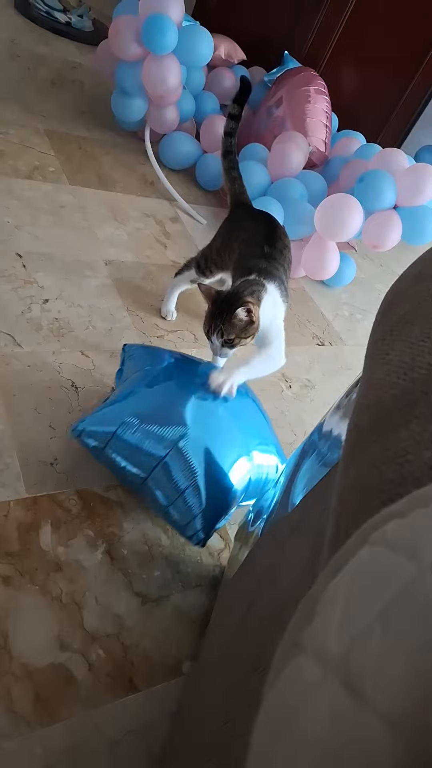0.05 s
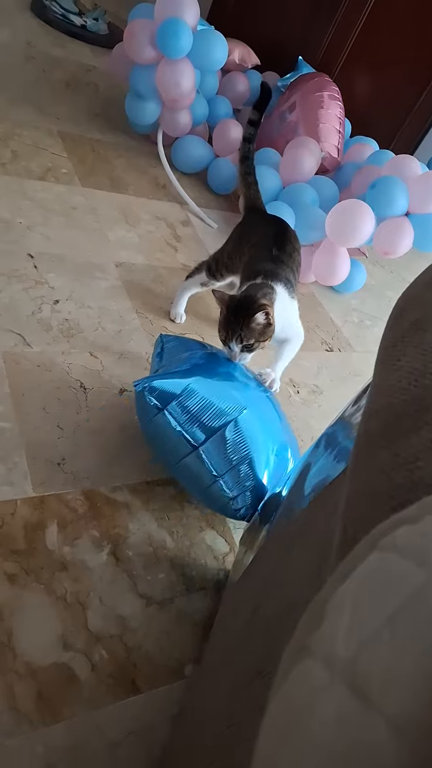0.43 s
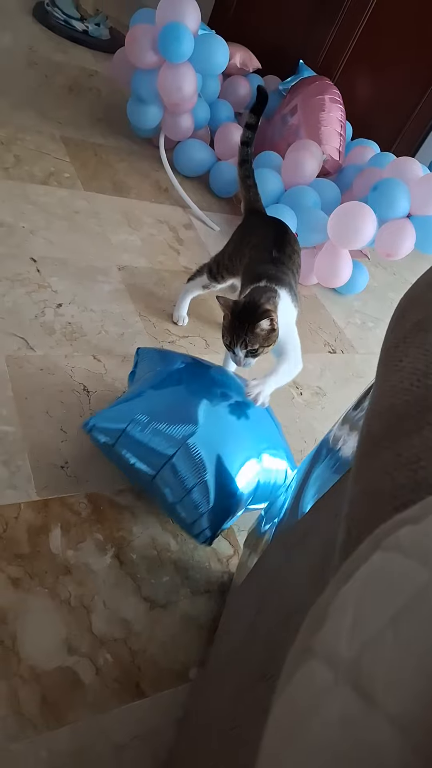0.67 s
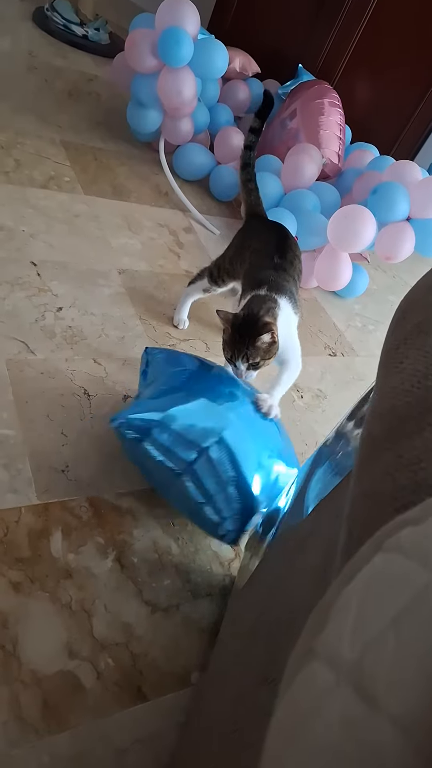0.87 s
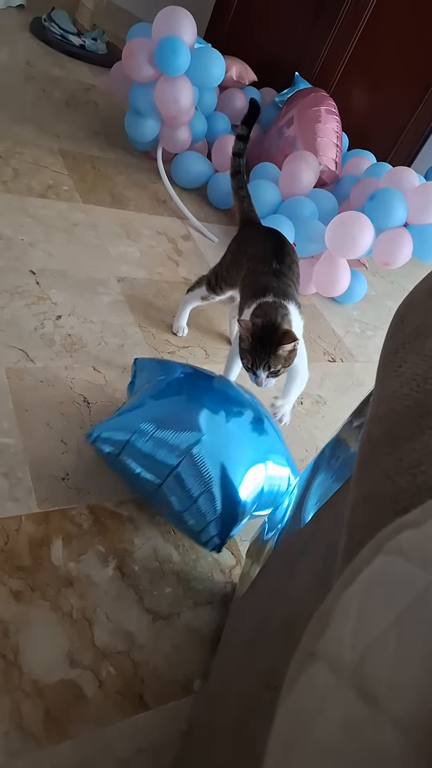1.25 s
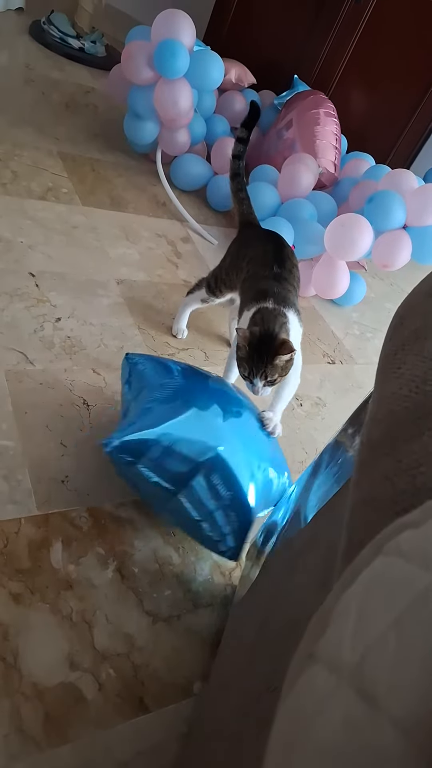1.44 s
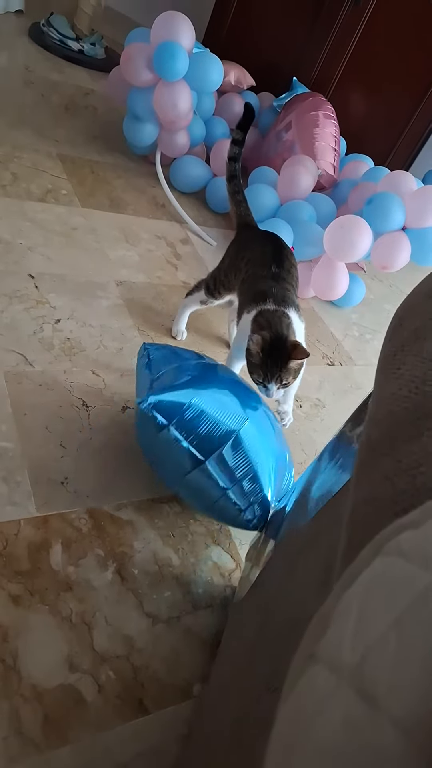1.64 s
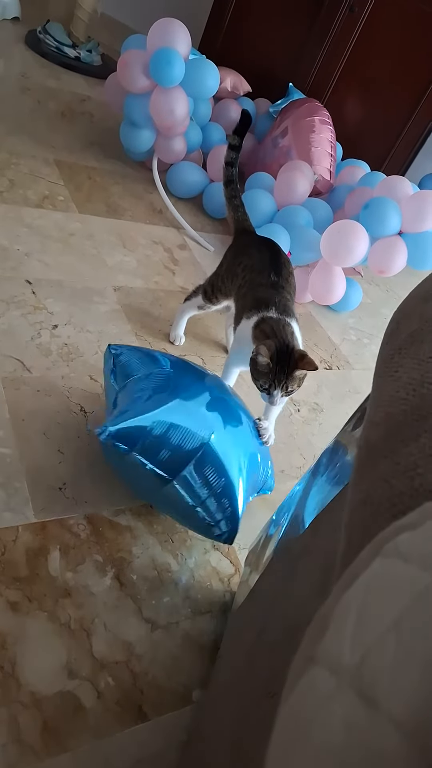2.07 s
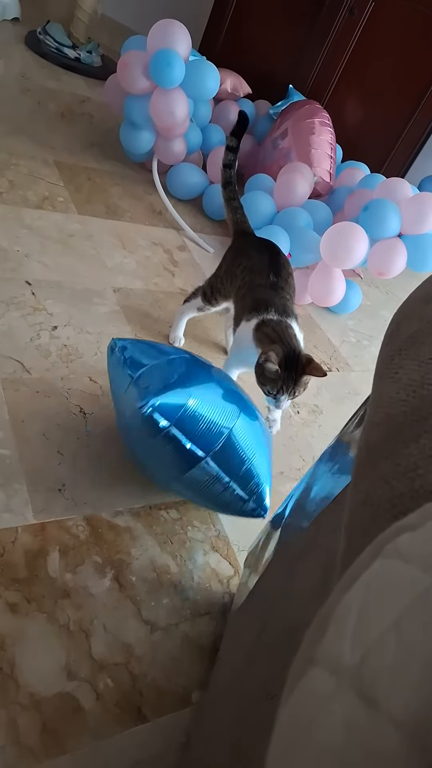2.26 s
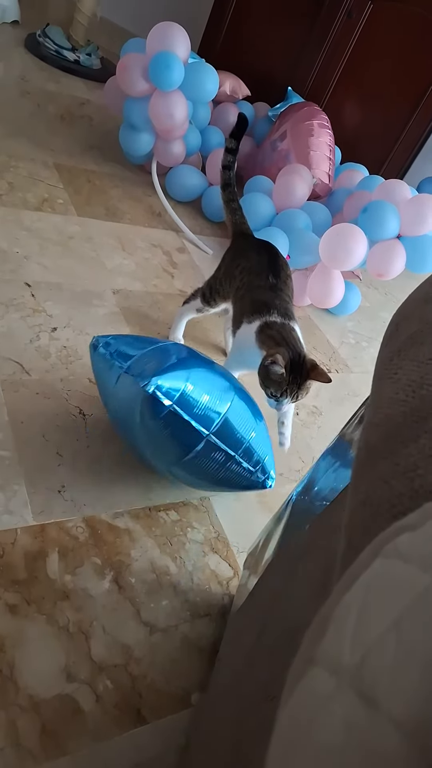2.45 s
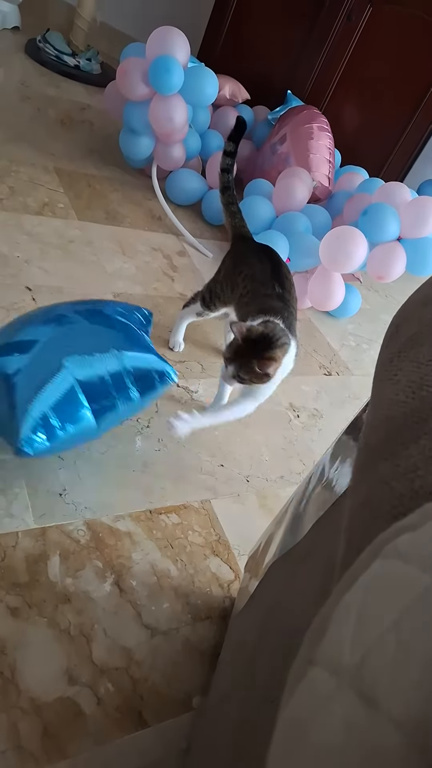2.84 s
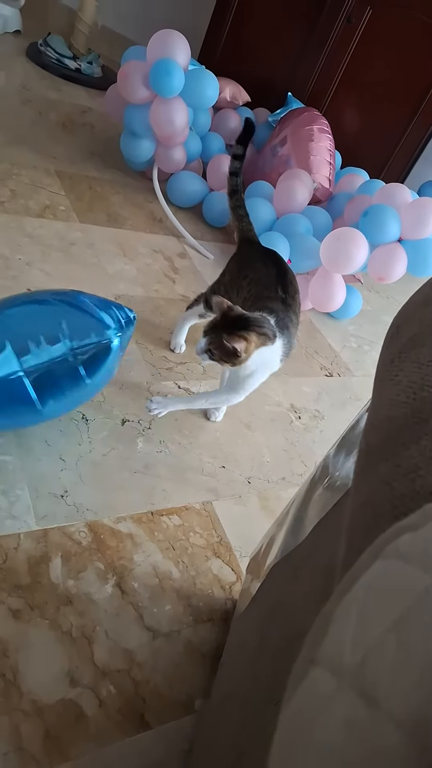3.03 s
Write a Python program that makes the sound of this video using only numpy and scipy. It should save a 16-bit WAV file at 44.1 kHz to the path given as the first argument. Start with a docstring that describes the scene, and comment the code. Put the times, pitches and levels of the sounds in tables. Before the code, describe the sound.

A foil balloon, pawed by a cat close by and slightly right, thumps softly and crackles, with a dense run of snaps around 0.4 seconds. More thumps and sharp snaps come from 0.8 to 1.1, then bumps and sliding rustles from 1.4. A faint, thin squeak at 2.5 leads into a loud swipe at 2.6, and light rustles follow. The bare room echoes over a low hum and rumble.

```python
"""A bare, echoing room with a stone floor. Close to a stereo microphone pair, a little to the right,
a cat paws a foil balloon along. Soft blows thump the gas inside, the foil buckles in sharp snaps,
and it rustles as paw and floor slide on it. A thin squeak comes just before the last swipe.
Behind it all, a low hum and rumble fill the room."""
import sys
import numpy as np
from scipy import signal
from scipy.fft import rfft, irfft
from scipy.io import wavfile
from scipy.ndimage import uniform_filter1d

SR = 44100
rng = np.random.default_rng(int(sys.argv[2]) if len(sys.argv) > 2 else 0)


def put_to_file(sound):
    """Save the sound as 16-bit audio at rate SR, in the file named by the first command-line argument."""
    columns = np.atleast_2d(sound).T  # one column per channel
    safe = np.clip(columns, -1, 1)
    whole_steps = np.round(safe * 32767)
    wavfile.write(sys.argv[1], SR, whole_steps.astype(np.int16))


N = 136710

# paw blows and bumps on the floor (time [s], level [dB], firmness as cut-off [Hz])
BLOWS = [(0.144, -4.5, 310), (0.152, 1, 321), (0.179, -7.5, 384), (0.202, -0.5, 220), (0.3519, -7, 215),
         (0.38, -2, 308), (0.426, -4.5, 280), (0.8152, 5, 150), (0.835, -4.5, 171), (0.886, -5.5, 232),
         (0.98, -25, 168), (1.012, -1.5, 170), (1.083, -6, 150), (1.4146, 5, 141), (1.434, -7.5, 136),
         (1.562, -2.5, 160), (1.629, -15, 148), (1.984, -7, 162), (2.058, -9, 151), (2.646, -1, 139)]
# the foil buckles (time [s], level [dB], extra crack level [dB])
BUCKLES = [(0.0701, -26.5, -0.5), (0.1447, -22.5, 1), (0.182, -12, -14), (0.2224, -4.5, -1.5),
           (0.305, -12.5, 0), (0.3529, 1, -1.5), (0.3796, -2, 2), (0.3834, -8, -4), (0.3859, 0.5, -6),
           (0.39, -5, 1), (0.3963, -1.5, -6.5), (0.4056, -7.5, -2), (0.4157, -1.5, 0.5), (0.42, -5, 4),
           (0.4249, -0.5, -5), (0.43, -6, -7), (0.436, -9, -5), (0.459, -5, 4), (0.464, -7.5, -6),
           (0.816, -14.5, -11), (0.8436, -3, -12.5), (0.853, -9, -16), (0.9528, -3, -0.5),
           (0.9792, 1.5, 1.5), (1.0147, 0, 3), (1.083, 3.5, 0), (1.091, -1.5, 0.5), (1.5706, -8, -1),
           (1.6377, -12, 6), (2.6453, -8, -21), (2.769, -24.5, 12)]
# a snap's pressure pulse (frequency [Hz], level [dB])
POP_SPECTRUM = [(60, -17.5), (200, -3.5), (400, -2.5), (650, -3), (850, -10), (1150, -6.5), (1500, -13.5),
                (2000, -11), (3000, -25), (6000, -44), (16000, -49)]
# a snap's bright edge (frequency [Hz], level [dB])
CRACK_SPECTRUM = [(200, -8.5), (600, 0.5), (1150, 1), (2000, -1.5), (3000, -4.5), (4200, -2.5),
                  (6500, -5.5), (9000, -1.5), (12000, -3), (16000, -12.5)]
# paw or floor slides on the foil
# (start [s], rise [s], hold [s], release [s], level [dB], hiss [dB], bass [dB], room send [dB])
SLIDES = [(0.14, 0.0027, 0.036, 0.075, -10, -5, -8, -2.5), (0.288, 0.019, 0.023, 0.012, -2, -6, -12, -2),
          (0.379, 0.0017, 0.091, 0.056, 1.5, 2, 10, -0.5),
          (0.818, 0.0018, 0.0095, 0.0065, -3.5, -1.5, 3.5, -5),
          (0.84, 0.0028, 0.0089, .008, -0.5, -22, -7, -3), (0.862, .01, 0.056, .02, -11, -4, 10, -6),
          (0.974, 0.026, 0.095, .03, -9, 3, 14, 9), (1.415, 0.0018, 0.027, 0.043, -3.5, 3, -18, 2),
          (1.524, 0.019, 0.034, 0.064, -7, -16, -3, -3), (1.643, .02, 0.037, 0.025, -11, 5, -11, 5),
          (1.985, 0.023, 0.1, 0.04, -4.5, 1.5, -2, 0.5), (2.264, 0.055, 0.052, 0.022, -8, 4, -3, 0.5),
          (2.52, 0.026, 0.077, .02, -18, 2, -34, -5), (2.597, 0.011, 0.011, 0.0035, -0.5, -7, -11, -3.5),
          (2.618, 0.0045, 0.013, 0.012, 4.5, -1, -2.5, 3),
          (2.647, 0.0032, 0.0047, 0.0043, 15, -19, -10, -6.5), (2.663, 0.013, 0.02, 0.017, -3, -0.5, -4, 1),
          (2.72, 0.035, 0.03, 0.014, -5, 2, -3, 0.5), (2.95, .008, 0.006, 0.013, -17, 4.5, 0, 3),
          (3.06, 0.014, 0.027, .03, -19.5, 4.5, -3, -5)]
# the rubbed skin drums (frequency [Hz], level [dB])
SKIN_SPECTRUM = [(100, -16.5), (250, 2), (450, 4.5), (750, -4), (1200, 0), (1500, -1), (1900, -0.5),
                 (2800, -5.5), (4500, -9), (8000, -20.5), (16000, -29)]
# the creases hiss (frequency [Hz], level [dB])
HISS_SPECTRUM = [(500, -12.5), (2000, -15), (3000, 3), (4300, 3), (6800, -1), (8500, 1.5), (10000, -0.5),
                 (12500, 1), (16000, -10)]
# the low end of a slide (frequency [Hz], level [dB])
BASS_SPECTRUM = [(60, -11), (130, 2), (190, -4), (330, -1.5), (480, -14.5), (1000, -26), (4000, -64)]
# resonances of the gas (frequency [Hz], level [dB], time to fall 60 dB [s])
GAS_MODES = [(158.7, 3, 0.19), (207, -18, 0.22), (255.1, -2.5, 0.2), (307, 0, 0.13), (362.8, -5.5, 0.51),
             (397.1, -15.5, 0.75), (519, -9, 0.75), (674.6, 5, 0.073), (872, -11, 0.32), (1113, -2.5, .4),
             (1232, -9, 0.35)]
# the squeak's course (time [s], unsounded fundamental [Hz], level [dB])
SQUEAK_PATH = [(2.506, 3850, -82), (2.53, 3910, -64.5), (2.566, 4060, -63), (2.596, 4140, -61),
               (2.618, 4070, -57), (2.63, 4050, -85)]
# its sounding partials (harmonic [number], level [dB])
SQUEAK_HARMONICS = [(2, -12), (3, -3)]
# near reflections off floor and furniture (delay [s], level [dB])
REFLECTIONS = [(.00105, -9), (.0042, -17.5), (.0086, -11)]
# reverberation time (frequency [Hz], time to fall 60 dB [s])
ROOM_DECAY = [(80, 0.69), (260, 0.66), (700, 0.8), (1840, 0.72), (4850, 0.75), (12800, 0.54)]
# tone of the reverberation (frequency [Hz], level [dB])
ROOM_SPECTRUM = [(60, 4.5), (150, 4), (300, 1), (480, -2.5), (660, 1.5), (900, -3), (1200, -0.5), (3000, 0),
                 (8000, -2), (16000, -7)]
# background rumble (frequency [Hz], level [dB])
RUMBLE_SPECTRUM = [(20, -42), (35, -9), (52, 3.5), (70, -6), (110, -3), (160, -13), (400, -17),
                   (800, -23.5), (1300, -27.5), (3000, -47), (8000, -47), (16000, -70)]
# likeness of the room sound at the two microphones (frequency [Hz], correlation [ratio])
MIC_COHERENCE = [(60, 0.88), (250, 0.9), (500, 0.65), (1000, 0.15), (2000, 0.0078), (16000, 0.013)]
# stereo balance (frequency [Hz], left minus right [dB])
MIC_BALANCE = [(60, 2.5), (250, -1.5), (500, -2.5), (1000, -4), (2000, -2.5), (4000, -1), (8000, -3),
               (13000, -9.5)]

# Table levels are relative: these gains set the mix. WET gains feed the room.
THUMP_DB, THUMP_LOW_CUT_HZ, THUMP_WET_DB = 12, 68, -0.5
POP_DB, CRACK_DB, CRACK_DECAY_S, SNAP_WET_DB = 5, -26.5, 0.001, 1
SHIVER_DB, SHIVER_DECAY_S = -6, 0.0067
SKIN_DB, HISS_DB, BASS_DB, RUB_WET_DB = -37, -50, -41, 3.5
SLIPS_PER_S, SLIP_SPREAD_DB = 7000, 1.65
THUMP_RING_DB, FOIL_RING_DB = -62, -48  # how strongly each rings the gas
SQUEAK_DB, SQUEAK_WET_DB = 5.5, -1
ROOM_BUILD_S, RUMBLE_DB, HUM_HZ, HUM_DB = 0.0096, -51.5, 86.6, -51.5
MIC_OPEN_S, MIC_FADE_S, MIC_LOW_HZ, MIC_TOP_HZ = 0.065, 0.0083, 34, 15900


def thumps():
    """Soft pushes on the balloon: the firmer the contact, the higher in frequency the pulse reaches."""
    pulses, kick = np.zeros(N), signal.unit_impulse(SR // 10)
    for start, db, cutoff_hz in BLOWS:
        pulse = signal.sosfilt(signal.butter(4, cutoff_hz, fs=SR, output="sos"), kick)
        add(pulses, start, -undb(db + THUMP_DB) * pulse)
    return signal.sosfilt(signal.butter(2, THUMP_LOW_CUT_HZ, "high", fs=SR, output="sos"), pulses)


def snaps(t):
    """A patch of foil flips: one pressure pulse from the skin, a bright crack and a short shiver."""
    age, flips, cracks = t[:SR // 20], np.zeros(N), np.zeros((2, N))
    fade = np.exp(-(age / CRACK_DECAY_S) ** 2) + undb(SHIVER_DB) * np.exp(-age / SHIVER_DECAY_S)
    for start, db, crack_db in BUCKLES:
        add(flips, start, undb([db]))
        noise = np.sign(rng.standard_normal((2, len(age))))
        add(cracks, start, undb(db + crack_db) * fade * noise)
    pops = undb(POP_DB) * colour(flips, POP_SPECTRUM)
    return pops + undb(CRACK_DB) * colour(near_pair(cracks), CRACK_SPECTRUM)


def rubs(t):
    """Dense tiny slips drum on the skin and hiss in the creases. Gives direct sound and room send."""
    drives = np.zeros((3, 2, N))  # skin, hiss, bass; each direct and to the room
    for start, rise, hold, release, db, hiss_db, bass_db, room_db in SLIDES:
        attack = np.clip((t - start) / rise, 0, 1)
        fade = np.exp(-np.maximum(t - start - rise - hold, 0) / release)
        gains = np.outer(undb([SKIN_DB, HISS_DB + hiss_db, BASS_DB + bass_db]), undb([0, room_db]))
        drives += gains[..., None] * undb(db) * attack * fade
    sizes = undb(SLIP_SPREAD_DB * np.minimum(rng.exponential(size=N), 4))
    slips = (rng.random(N) < SLIPS_PER_S / SR) * sizes * rng.standard_normal((2, N))
    slips = near_pair(slips / slips.std())
    spectra = SKIN_SPECTRUM, HISS_SPECTRUM, BASS_SPECTRUM
    return sum(colour(drive[:, None] * slips, shape) for drive, shape in zip(drives, spectra))


def gas_ring(strikes, t):
    """The gas inside the balloon rings on with whatever strikes the skin."""
    modes = sum(undb(db) * np.cos(2 * np.pi * hz * t) * decay(t, t60) for hz, db, t60 in GAS_MODES)
    return convolve(strikes, modes)


def squeak(t):
    """A thin, slightly unsteady squeak that rises and sags at the end."""
    times, hz, db = np.array(SQUEAK_PATH).T
    waver = uniform_filter1d(rng.standard_normal(N), size=60)
    pitch = np.interp(t, times, hz) * (1 + .003 * waver / waver.std())
    phase = 2 * np.pi * np.cumsum(pitch) / SR
    level = undb(np.interp(t, times, db)) * (t > times[0]) * (t < times[-1])
    return level * sum(undb(gain_db) * np.sin(round(k) * phase) for k, gain_db in SQUEAK_HARMONICS)


def near_echoes(x):
    """Floor and furniture return delayed, weaker copies."""
    return weigh(x, sum(undb(db) * np.exp(-2j * np.pi * bins() * lag) for lag, db in REFLECTIONS))


def room_tail(t):
    """The bare room's reverberant response, each octave dying at its own rate."""
    noise, tail = rfft(diffuse()), 0
    centres = np.geomspace(60, 15360, 9)
    hz = np.maximum(np.linspace(0, SR / 2, noise.shape[1]), 1)
    for centre, share in zip(centres, np.eye(len(centres))):
        band = irfft(noise * np.interp(np.log(hz), np.log(centres), share), N)
        tail += band * decay(t, along(ROOM_DECAY, centre))
    tail *= 1 - np.exp(-(t / ROOM_BUILD_S) ** 2)
    return colour(tail / np.sqrt(np.sum(tail ** 2) / 2), ROOM_SPECTRUM)


def room_tone(t):
    """Low rumble all around the microphones, with a wavering hum."""
    rumble = colour(diffuse(), RUMBLE_SPECTRUM)
    waver = weigh(rng.standard_normal(N), np.exp(-(bins() / 4) ** 2))
    hum = (1 + 0.39 * waver / waver.std()) * np.sin(2 * np.pi * HUM_HZ * t)
    return undb(RUMBLE_DB) * rumble / rumble.std() + undb(HUM_DB) * hum


def diffuse():
    """Noise at the two microphones, alike in the bass and unrelated in the treble."""
    likeness = np.clip(along(MIC_COHERENCE, bins()), -1, 1)
    mid, side = rng.standard_normal((2, N))
    mid = weigh(mid, np.sqrt((1 + likeness) / 2))
    side = weigh(side, np.sqrt((1 - likeness) / 2))
    return np.array([mid + side, mid - side])


def near_pair(x):
    """Two unrelated signals become one in the bass, as at two close microphones."""
    shared = 1 / (1 + (bins() / 1900) ** 4)
    left = weigh(x[0], np.sqrt(shared)) + weigh(x[1], np.sqrt(1 - shared))
    return np.array([left, x[0]])


def undb(db):
    """Decibels to gain."""
    return 10 ** (np.asarray(db) / 20)


def decay(t, t60):
    """A fall of 60 dB every t60 seconds."""
    return np.exp(-np.log(1000) * t / t60)


def along(points, hz):
    """Read a table on a log-frequency axis."""
    knots_hz, values = np.array(points, float).T
    return np.interp(np.log(np.maximum(hz, 1)), np.log(knots_hz), values)


def bins():
    """Frequencies of the padded spectrum."""
    return np.arange(N + 1) * SR / (2 * N)


def weigh(x, gain):
    """Apply a gain for each frequency."""
    return irfft(rfft(x, 2 * N) * gain)[..., :N]


def colour(x, points):
    """Causal filter through (frequency [Hz], level [dB]) points."""
    cepstrum = irfft(np.log(undb(along(points, bins()))))
    cepstrum[1:N] *= 2  # fold onto positive time for minimum phase
    cepstrum[N + 1:] = 0
    return weigh(x, np.exp(rfft(cepstrum)))


def convolve(x, response):
    """Pass a sound through a response."""
    return weigh(x, rfft(response, 2 * N))


def add(out, start, x):
    """Mix a sound in at its time."""
    i = max(int(start * SR), 0)
    out[..., i:i + x.shape[-1]] += x[..., :N - i]


def scene():
    """The balloon close by and a little to the right, with its near echoes and the room behind."""
    t = np.arange(N) / SR
    tail, background = room_tail(t), room_tone(t)
    rub, rub_send = rubs(t)
    thump, thin_squeak, snap = thumps(), squeak(t), snaps(t)
    foil = snap + rub
    gas = gas_ring(undb(THUMP_RING_DB) * thump + undb(FOIL_RING_DB) * foil.mean(axis=0), t)
    direct = thump + foil + gas + undb(SQUEAK_DB) * thin_squeak
    send = (undb(THUMP_WET_DB) * thump + undb(SNAP_WET_DB) * snap
            + undb(RUB_WET_DB) * rub_send + undb(SQUEAK_WET_DB) * thin_squeak)
    sound = direct + near_echoes(foil) + convolve(send, tail) + background
    left_db = along(MIC_BALANCE, bins()) / 2
    return weigh(sound, undb([left_db, -left_db]))


def record(dry):
    """The microphones open after a moment and cut the deepest bass and the top."""
    opening = np.clip((np.arange(N) / SR - MIC_OPEN_S) / MIC_FADE_S, 0, 1)
    low_cut = signal.butter(4, MIC_LOW_HZ, "high", fs=SR, output="sos")
    top_cut = signal.ellip(10, .2, 80, MIC_TOP_HZ, fs=SR, output="sos")
    return signal.sosfilt(top_cut, signal.sosfilt(low_cut, dry * opening))


dry = scene()
out = record(dry)
put_to_file(out)
```